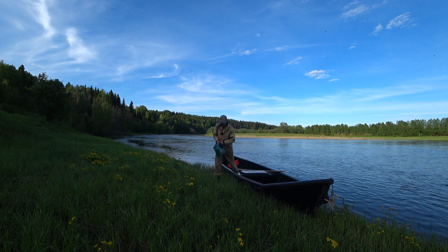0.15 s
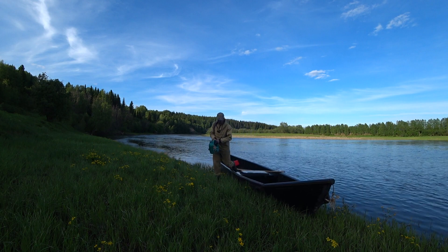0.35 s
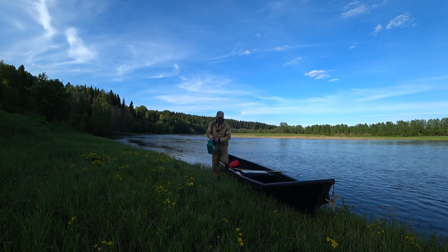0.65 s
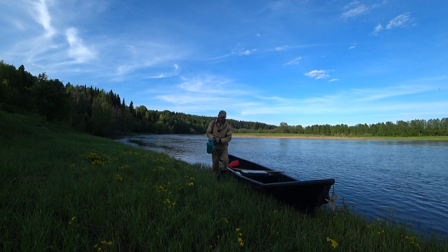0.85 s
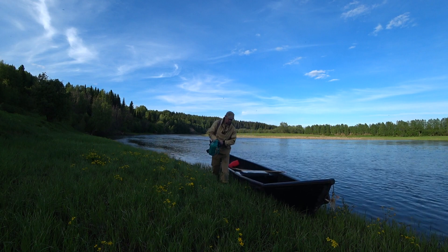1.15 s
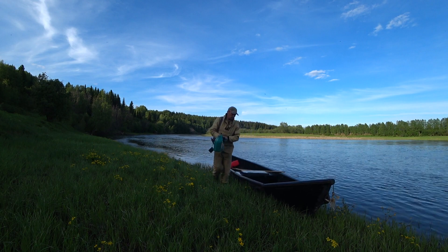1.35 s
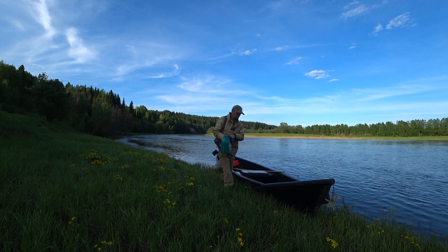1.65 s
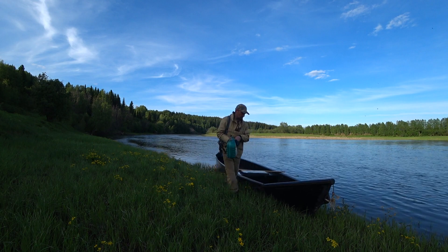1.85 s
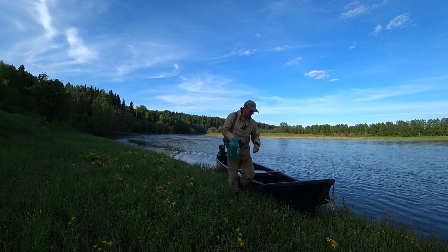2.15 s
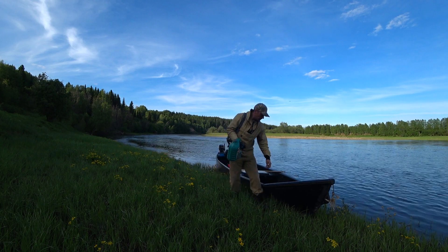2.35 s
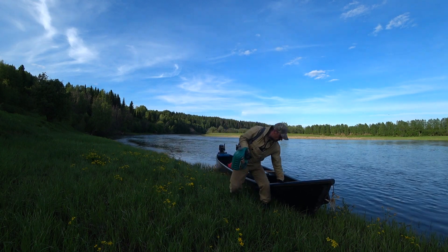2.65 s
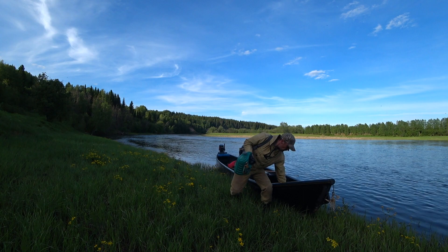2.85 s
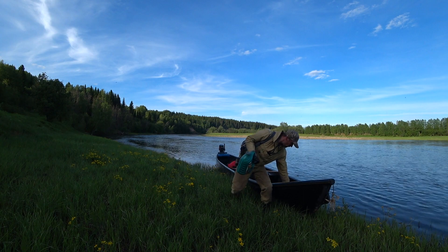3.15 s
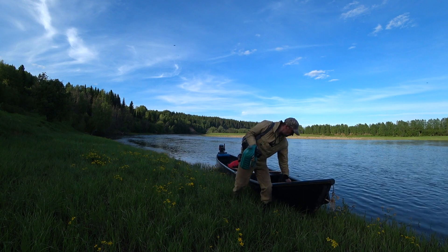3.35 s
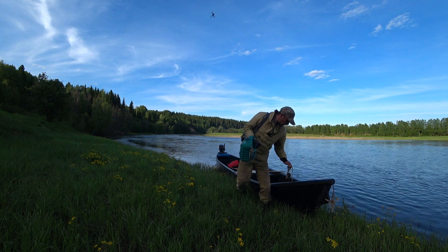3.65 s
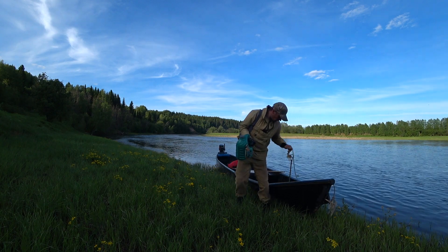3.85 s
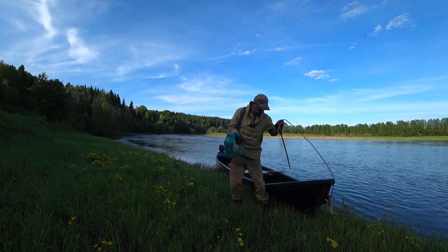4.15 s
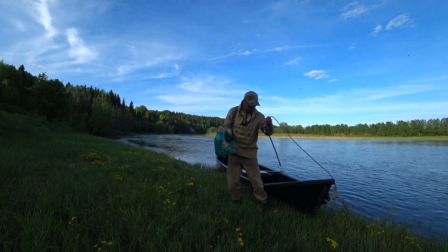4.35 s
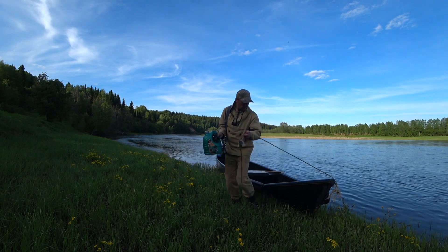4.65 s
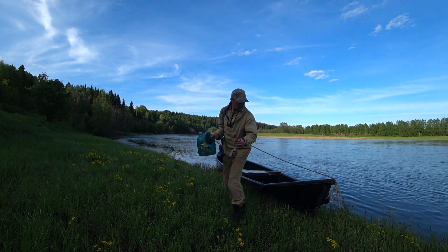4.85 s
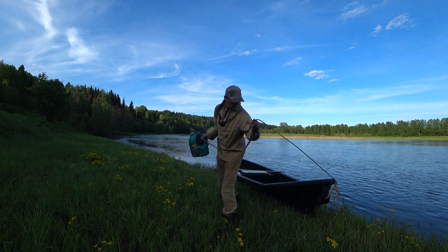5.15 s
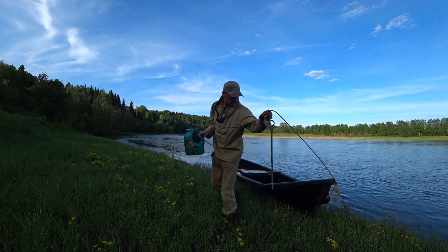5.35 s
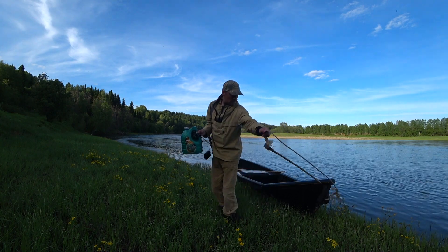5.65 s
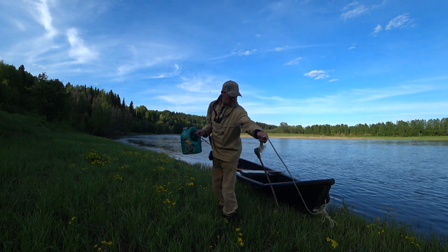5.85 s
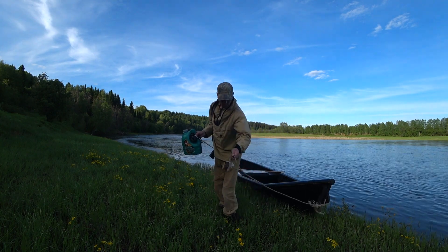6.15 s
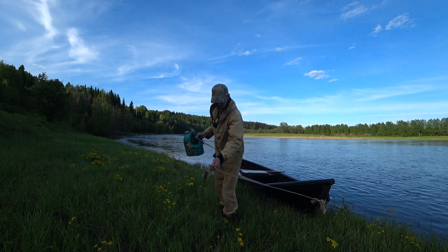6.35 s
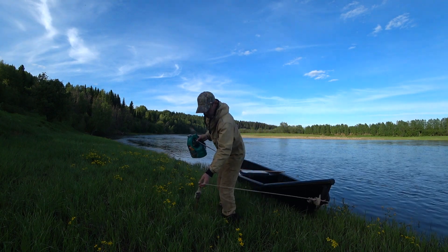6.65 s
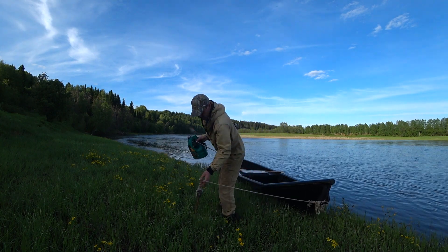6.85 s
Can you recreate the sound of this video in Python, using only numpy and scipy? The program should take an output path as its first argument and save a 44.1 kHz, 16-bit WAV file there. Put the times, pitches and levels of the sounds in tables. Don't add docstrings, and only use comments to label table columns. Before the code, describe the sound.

On a quiet grassy riverbank, a boot booms on a hollow plastic hull, then a plastic can bumps and trousers swish through snapping grass. Mid-way an anchor scrapes and knocks the bow in a quick cluster, ending in one loud clunk and a brief zip of rope. More rustling and hollow can bumps follow, then near quiet. A small camera hears it close, with faint water, birds and a grasshopper behind.

```python
import sys
import numpy as np
from scipy import signal
from scipy.fft import rfft, irfft, next_fast_len
from scipy.io import wavfile
from scipy.ndimage import uniform_filter1d, map_coordinates

SR = 44100
rng = np.random.default_rng(int(sys.argv[2]) if len(sys.argv) > 2 else 0)


def bounce(signal):
    frames = np.transpose(np.atleast_2d(signal))
    limited = np.clip(frames, -1, 1)
    pcm = np.round(limited * 32767).astype(np.int16)
    wavfile.write(sys.argv[1], SR, pcm)


def decibels_to_gain(level_db):
    exponent = np.asarray(level_db, float) / 20
    return 10 ** exponent


N = 308700

BANK_DB = -51
MIC_LOW_HZ, TOP_HZ = 57, 15830

# [f/Hz, correlation]
BANK_SPECTRUM = [(12, -34), (20, 3), (107, -9.5), (158, -10.5), (204, -13.5), (234, -11.5), (319, -8.5),
                 (446, -10), (780, -10.5), (849, -14), (1150, -9), (1910, -15), (16000, -34.5)]
BANK_ALIKE = [(60, 0.92), (180, 0.063), (550, -0.68), (1650, -0.66), (4970, -0.27), (15000, 0.0034)]
# [start t/s, end t/s, level/dB]
CHIRPS = [(0, .3, -70), (2.95, 3.17, -68), (3.48, 3.703, -65), (5.8, 6.02, -69), (6.3, 6.5, -69),
          (6.79, 7, -67)]
# [start t/s, end t/s, first f/Hz, last f/Hz, level/dB]
BIRDS = [
    (0, .13, 800, 790, -57.5),
    (.25, 0.29, 800, 800, -54),
    (0.302, .345, 890, 850, -55),
    (.015, .085, 5100, 4650, -69),
    (6.337, 6.458, 4250, 4200, -65),
    (6.34, 6.45, 5500, 5450, -70),
]
# [t/s, trouser rub level/dB, grass relative to rub/dB]
SWISH = [(0.0, -60.5, -6), (0.08, -61.5, -5), (0.64, -60, -7), (0.74, -49, -10), (0.8, -60, -8),
         (0.82, -56, -7), (0.94, -56, -6), (0.97, -48.5, -2), (1.07, -42, -5.5), (1.13, -44.5, -3),
         (1.15, -55.5, -5), (1.3, -48.5, -8.5), (1.32, -42.5, -10), (1.34, -50.5, 0), (1.36, -43, -7),
         (1.4, -44.5, -4), (1.71, -40.5, -1.5), (1.79, -48, -2.5), (1.87, -36.5, -7), (1.91, -46.5, -7.5),
         (2.01, -54, -1), (2.07, -45.5, -7), (2.11, -52, -3), (2.26, -47, -3), (2.3, -54.5, -7),
         (2.32, -45, -4.5), (2.42, -38.5, -3.5), (2.59, -41, -3.5), (2.63, -48, -5), (2.67, -49.5, -6),
         (2.75, -56, -7.5), (3.14, -65, -1), (3.16, -65, 0), (3.18, -46.5, -33), (3.27, -54, -10),
         (3.39, -48.5, -23), (3.41, -55, -12), (3.49, -46, -13), (3.53, -55.5, -3), (3.55, -53, -15),
         (3.57, -53, -5), (3.76, -51.5, -6.5), (3.88, -46.5, 1.5), (3.94, -39, -9), (3.96, -43, 2),
         (4.0, -36.5, -7), (4.03, -48.5, -6), (4.07, -50.5, -5.5), (4.42, -58.5, -3.5), (4.5, -51.5, -5.5),
         (4.68, -52.5, -4.5), (4.8, -41, -2.5), (5.01, -39.5, -3), (5.11, -41.5, -8), (5.17, -51, -7.5),
         (5.44, -55.5, -1.5), (5.56, -45, -1.5), (5.63, -39, -9.5), (5.65, -50.5, -10), (5.81, -65, -2),
         (6.24, -75, 2), (6.36, -58, -3.5), (6.69, -68, -4), (6.73, -49.5, -6), (6.82, -75, -3),
         (6.92, -69, -2), (6.94, -63, -11), (6.96, -70, 6), (7.0, -71, -3)]
# [t/s, feet level/dB, heavy cloth level/dB]
SHUFFLE = [(0.0, -57, -57), (0.56, -56.5, -52.5), (0.72, -53.5, -53.5), (0.86, -60, -57.5),
           (1.07, -52, -51.5), (1.46, -54, -58), (1.77, -53, -51.5), (2.18, -56.5, -56),
           (2.53, -54.5, -57.5), (2.67, -55.5, -56), (3.02, -60.5, -58), (3.2, -51.5, -46),
           (3.33, -45, -48), (3.43, -39.5, -44.5), (3.57, -38, -53), (3.68, -47.5, -54), (3.82, -60, -58),
           (4.11, -48.5, -49.5), (4.33, -54.5, -52), (4.56, -55.5, -54.5), (4.82, -55, -59),
           (4.95, -59, -52.5), (5.17, -50.5, -52), (5.89, -61.5, -56), (6.32, -64.5, -67), (7.0, -59, -63)]
# [f/Hz, density/dB]
CLOTH_SPECTRUM = [(1180, -10), (2000, -7.5), (2880, -5.5), (4850, 0.5), (5420, -1.5), (6720, -2.5),
                  (9500, -28), (12400, -6), (20900, -120)]
GRASS_SPECTRUM = [(4410, -37), (7500, -3.5), (12900, -10.5), (15200, -13.5), (16000, -32)]
FOLD_SPECTRUM = [(290, -37), (500, -5), (603, -6.5), (675, -1), (3000, -14), (3900, -14.5), (6600, -120)]
TREAD_SPECTRUM = [(29, -47), (50, -5.5), (178, -2), (241, -0.5), (575, -8), (900, -23.5), (1170, -46),
                  (1980, -120)]
# [t/s, peak level/dB, f/Hz, left over right/dB]
TICKS = [(0.0827, -43, 3090, 1.5), (0.2252, -37, 3950, 4), (0.382, -40, 3250, 1.0),
         (0.4938, -39, 3800, 1.5), (0.7068, -38, 6190, 1.5), (0.7257, -29.5, 4150, 7),
         (0.7664, -44.5, 3680, 1.5), (0.8164, -42, 6770, 5), (0.8259, -26.5, 3240, 2.5),
         (0.847, -31, 3600, 5), (0.9385, -38, 4880, 4), (0.9728, -37, 3660, 5), (1.044, -30, 6530, 3.0),
         (1.1996, -38, 4580, 8), (1.3154, -48, 3100, -5), (1.3154, -27, 5350, 3), (1.3244, -27, 5640, 4.0),
         (1.3528, -23, 5400, 3), (1.3652, -32, 6220, 2.5), (1.5648, -30, 6300, 4), (1.6646, -29, 4560, -2),
         (1.9492, -30, 4570, 2), (2.035, -40, 4880, 2.5), (2.071, -31.5, 6020, 3.0), (2.1655, -37, 4590, 0),
         (2.2353, -32, 5030, 2.5), (2.3116, -37, 7010, 5), (2.3286, -34.5, 5480, -6),
         (2.9394, -41, 4070, 2.0), (4.1594, -35, 4390, 5), (4.2547, -32, 4160, 1.5),
         (4.2762, -23.5, 4030, 3), (4.3569, -26.5, 2700, 1.5), (4.4094, -50, 4080, -2),
         (4.7182, -35, 5100, 1), (5.2245, -34, 5710, 3), (5.7713, -42, 6590, 1.0), (5.9327, -40, 4500, 2.0),
         (6.1095, -58, 4090, -2), (6.347, -46, 4240, 2.5), (6.9405, -38.5, 6450, 2.5)]
# [f/Hz, level/dB, t60/s]
CAN_MODES = [(161.5, -7.5, 0.22), (186.4, -0.5, 0.12), (316, -14, 0.11), (425, -4.5, 0.035),
             (595, -5, 0.068), (833, -7.5, 0.08), (1113, -14, 0.06), (1380, -13, 0.12), (2340, -3, .02)]
STERN_MODES = [(69.5, -6, 0.24), (96, -6.5, 0.65), (116, -7.5, 0.51), (144.5, 0, 0.42), (164.5, -8, 0.23),
               (200, -4, 0.29), (245, -13, 0.17), (327, -17, 0.22), (400, -22, 0.17), (565, -29, .08),
               (850, -34, .1)]
DECK_MODES = [(98.3, -15.5, 0.58), (138, -13, 0.19), (218, -4, 0.26), (269, 0, .2), (302, 0.5, 0.22),
              (385, -4.5, 0.14), (584, -7.5, 0.24), (700, -4, 0.098), (770, -5, 0.088), (1110, -7.5, 0.12),
              (1670, -7, 0.074), (1930, -10.5, 0.076), (2510, -8.5, 0.043), (2770, -34, 0.028),
              (3600, -17, 0.058), (4550, -16, 0.044)]
RIB_MODES = [(138.2, -12.5, 0.57), (210, -3, 0.22), (300, 0, .1), (371.7, -3.5, .2), (478, -7.5, 0.085),
             (604, 1, 0.14), (700, -9, 0.14), (872, -5.5, 0.075), (1160, -12, .06), (1294, -1.5, 0.039),
             (1500, -24, .05), (1880, -8.5, 0.035), (2460, -26, 0.039), (2920, -31, 0.021)]
RAIL_MODES = [(96.8, -7.5, 0.42), (122.6, -8.5, 0.34), (200, -13.5, .35), (274.6, -1.5, 0.21),
              (311, -2, 0.15), (390, -6, 0.23), (522, -11, 0.15), (599, 0, 0.092), (668, 0, 0.037),
              (710, -2, 0.1), (1044, -5.5, 0.057), (1142, -2, 0.062), (1300, -25, 0.061),
              (1760, -7.5, 0.056), (2000, -32, .03), (2570, -8, 0.036), (2700, -34, 0.026),
              (3350, -9, 0.021), (4600, -32, .015)]
FLUKE_MODES = [(332, -4, .08), (900, -10, .05), (1230, 2, 0.062), (1390, -1, 0.05), (1650, -4, 0.037)]
# [t/s, level/dB, hardness f/Hz, contact length/s, ring share of t60/1]
BUMP_BLOWS = [(.262, -39, 300, 0.013, 1.2), (1.239, -27, 5050, 0.0051, 0.58), (1.245, -26, 400, .002, 1),
              (1.397, -35, 3530, .003, 0.68), (1.403, -44, 300, 0.0017, 2.5), (1.5, -46, 400, 0.011, 1.6),
              (1.59, -43.5, 400, .01, 1.3), (1.72, -41.5, 800, 0.011, 1), (1.855, -39, 1500, 0.013, 0.59),
              (2.06, -49, 600, 0.022, 1.3), (5.09, -40, 600, .01, 0.63), (5.238, -28.5, 2000, 0.0054, 0.55),
              (5.247, -24.5, 1500, 0.0046, 0.4), (5.262, -32.5, 1180, .003, 1),
              (5.61, -41.5, 1500, 0.03, 0.43)]
BOOT_BLOWS = [(.568, -21.5, 1500, 0.0027, 1), (.588, -24.5, 300, 0.0024, 0.72),
              (.625, -22.5, 300, 0.0058, 0.88), (.69, -31.5, 300, .005, 0.57),
              (.73, -40, 300, 0.0046, 0.38), (.762, -38, 300, 0.004, 0.47), (.855, -48, 300, .005, 0.75),
              (1.095, -39, 500, 0.024, 0.38), (1.115, -45, 400, .01, 0.46), (3.66, -36, 200, 0.0092, 0.79),
              (4.595, -42, 800, 0.013, .5)]
LIFT_BLOWS = [
    (3.157, -37.5, 5000, 0.013, 0.81),
    (3.178, -20.5, 5600, 0.011, 1),
    (3.204, -23.5, 4800, 0.0061, 0.63),
    (3.22, -20.5, 800, 0.0046, .8),
    (3.248, -31, 2000, 0.0065, 0.76),
    (3.388, -31.5, 2950, 0.0069, 0.83),
    (3.41, -34, 1230, 0.0088, 0.89),
    (3.432, -38, 4000, .01, 0.51),
    (3.488, -39, 1500, .01, 0.74),
]
KNOCK_BLOWS = [
    (3.543, -19, 4700, 0.0024, 1),
    (3.557, -24.5, 1500, 0.0035, 0.87),
    (3.575, -19.5, 900, .002, 0.36),
    (3.61, -34, 700, .004, 0.88),
    (4.29, -45.5, 1500, .015, 0.87),
    (4.335, -47, 500, .005, .8),
]
CLUNK_BLOWS = [
    (3.928, -11.5, 6000, 0.0052, 0.98),
    (3.975, -28.5, 800, .003, 0.51),
]
TOCK_BLOWS = [
    (3.625, -33, 4000, 0.0035, 0.74),
    (3.637, -42, 3000, .003, 0.85),
    (4.407, -56, 1500, .002, .6),
]
# [t/s, level/dB]
DRAG = [
    (3.1, -58),
    (3.186, -54),
    (3.342, -44),
    (3.452, -33),
    (3.56, -46),
]
# [f/Hz, t60/s]
SHORE_DECAY = [(150, 0.1), (1000, 0.25), (6000, 0.13)]
# [t/s, f/Hz, level/dB]
ROPE = [
    (4.04, 2800, -64),
    (4.08, 2850, -48),
    (4.12, 3250, -50),
    (4.16, 3330, -54),
    (4.22, 3480, -59),
    (4.25, 3480, -75),
]


def unit(x):
    return x / np.sqrt(np.mean(x ** 2) + 1e-20)


def along(points, hz):
    f, v = np.transpose(points)
    return np.interp(np.log(hz + 1), np.log(f + 1), v)


def curves(rows):
    s, *cols = np.transpose(rows)
    return [np.interp(np.arange(N) / SR, s, c) for c in cols]


def wobble(rate_hz):
    knots = rng.standard_normal(int(N * rate_hz / SR) + 4)
    return map_coordinates(knots, [np.arange(N) * rate_hz / SR])


def filtered(x, response):
    m = next_fast_len(N + 8192)
    return irfft(rfft(x, m) * response(np.fft.rfftfreq(m, 1 / SR)), m)[..., :N]


def panned(x, pan_db):
    return x * decibels_to_gain([[pan_db / 2], [-pan_db / 2]])


def rush(spectrum, alike, patchy_db, grit_db):
    raw = rng.standard_normal((2, N)) * decibels_to_gain(grit_db * wobble(700))
    z = signal.stft(raw, nperseg=256)[2]
    field = rng.standard_normal(z.shape[1:])
    field = uniform_filter1d(uniform_filter1d(field, size=6, axis=0), size=8, axis=1)
    pair = signal.istft(z * decibels_to_gain(patchy_db * unit(field)), nperseg=256)[1][:, :N]

    def response(hz):
        turn = np.arccos(np.clip(along(alike, hz), -1, 1)) / 2
        return decibels_to_gain(along(spectrum, hz)) * [np.cos(turn), np.sin(turn)]

    mid, side = filtered(pair, response)
    return unit(np.array([mid + side, mid - side]))


def bank():
    level_db = BANK_DB + 0.5 + 0.6 * wobble(3.21)
    return decibels_to_gain(level_db) * rush(BANK_SPECTRUM, BANK_ALIKE, patchy_db=1.2, grit_db=0.4)


def grasshopper():
    t = np.arange(N) / SR
    gate = np.zeros(N)
    for start_s, end_s, db in CHIRPS:
        gate += decibels_to_gain(db) * np.clip(np.minimum(t - start_s, end_s - t) / 0.04, 0, 1)
    body = [(2700, -40), (3200, -6), (3700, -9), (4300, -40)]
    wing = [(9200, -40), (9900, -3), (10300, 0), (10900, -6), (11600, -40)]
    return gate * rush(body + wing, [(9000, 0.4)], patchy_db=1.4, grit_db=2.4)


def birds():
    t, out = np.arange(N) / SR, np.zeros(N)
    for start_s, end_s, first_hz, last_hz, db in BIRDS:
        hz = np.interp(t, [start_s, end_s], [first_hz, last_hz]) * (1 + 0.01 * wobble(60))
        gate = np.clip(np.minimum(t - start_s + 0.005, end_s - t) / 0.012, 0, 1)
        out += decibels_to_gain(db + 2.3 * wobble(50)) * gate * np.sin(2 * np.pi * np.cumsum(hz) / SR)
    return out


def legs():
    rub_db, grass_db = curves(SWISH)
    rub_now_db = rub_db + 0.96 * wobble(30)
    cloth = rush(CLOTH_SPECTRUM, [(4000, 1.0)], patchy_db=1.5, grit_db=1.0)
    grass = rush(GRASS_SPECTRUM, [(9000, 0.98), (15000, 0.91)], patchy_db=2.3, grit_db=1.5)
    return panned(decibels_to_gain(rub_now_db) * cloth + decibels_to_gain(rub_now_db + grass_db) * grass, 3.7)


def jacket():
    rub_db, _ = curves(SWISH)
    _, fold_db = curves(SHUFFLE)
    level_db = fold_db - 1.0 + 0.31 * (rub_db + 53) + 1.33 * wobble(25)
    fold = rush(FOLD_SPECTRUM, [(600, 0.1), (2500, 1.0)], patchy_db=4.5, grit_db=2.0)
    return panned(decibels_to_gain(level_db) * fold, 0.3)


def feet():
    tread_db, _ = curves(SHUFFLE)
    level_db = tread_db - 1.5 + 2.2 * wobble(14)
    tread = rush(TREAD_SPECTRUM, [(60, 1.0), (600, 0.69)], patchy_db=1.5, grit_db=1.2)
    return panned(decibels_to_gain(level_db) * tread, -0.7)


def ticks():
    out, t = np.zeros((2, N + SR)), np.arange(500) / SR
    for s, db, hz, pan_db in TICKS:
        wide = signal.butter(3, [hz / 3.6, min(hz * 1.8, 12000)], "bandpass", fs=SR)
        click = signal.lfilter(*wide, rng.standard_normal(len(t)) * decibels_to_gain(-60 * t / 0.0075))
        stalk = np.sin(2 * np.pi * hz * t) * decibels_to_gain(-60 * t / 0.0073)
        snap = 0.87 * stalk + 1.01 * click
        out[:, round(s * SR):][:, :len(t)] += panned(decibels_to_gain(db - 1.5) * snap, pan_db)
    return out[:, :N]


def ring(modes, hard_hz, share):
    t = np.arange(SR * 3 // 4) / SR
    hz, db, t60 = np.transpose(modes)[..., None]
    soft = 1 / (1 + (hz / hard_hz) ** 2)
    swell = 1 - np.exp(-t * hz / 0.36)
    twin = np.sin(2 * np.pi * hz * t) + 0.38 * np.sin(2 * np.pi * 1.07 * hz * t)
    sides = (-1) ** np.arange(len(modes))[:, None]
    decay = decibels_to_gain(db - 60 * t / (t60 * share))
    return np.sum(sides * decay * soft * swell * twin, axis=0)


def lowpassed(x, edge_hz):
    return signal.sosfilt(signal.butter(4, edge_hz, fs=SR, output="sos"), x)


def struck(blows, modes):
    out, t = np.zeros(N + SR), np.arange(SR // 20) / SR
    for s, db, hard_hz, length_s, share in blows:
        chatter, hiss = rng.standard_normal((2, len(t)))
        contact = 0.041 * chatter * np.exp(-t / length_s)
        contact[0] = 1
        sound = signal.fftconvolve(contact, ring(modes, hard_hz, share))
        sharp = lowpassed(hiss, 0.9 * hard_hz) * decibels_to_gain(-60 * t / 0.025)
        dull = lowpassed(hiss, 0.35 * hard_hz) * decibels_to_gain(-60 * t / 0.066)
        sound[:len(t)] += 0.92 * sharp + 1.2 * dull
        out[round(s * SR):][:len(sound)] += decibels_to_gain(db) * sound
    return out[:N]


def can():
    return panned(struck(BUMP_BLOWS, CAN_MODES), -0.36)


def boot():
    return panned(struck(BOOT_BLOWS, STERN_MODES), -1.4)


def anchor():
    drag_db, = curves([(0, -120), (3.09, -120)] + list(DRAG) + [(3.6, -120)])
    rough = rng.standard_normal(N) * decibels_to_gain(9.7 * wobble(60))
    scrape = signal.fftconvolve(rough, ring(DECK_MODES, hard_hz=2500, share=0.4))[:N]
    bow = struck(LIFT_BLOWS, DECK_MODES) + struck(KNOCK_BLOWS, RIB_MODES)
    bow += struck(CLUNK_BLOWS, RAIL_MODES) + struck(TOCK_BLOWS, FLUKE_MODES)
    bow += decibels_to_gain(drag_db - 3.0) * unit(scrape)
    return panned(bow, -2.0)


def shore(x):
    hz, t, z = signal.stft(rng.standard_normal((2, SR // 3)), SR, nperseg=256)
    decay = decibels_to_gain(-60 * t / along(SHORE_DECAY, hz)[:, None])
    tail = signal.istft(z * decay, SR, nperseg=256)[1]
    late = np.pad(x, (300, 0))[None]
    return signal.fftconvolve(late, tail / np.linalg.norm(tail[0]), axes=1)[:, :N]


def rope():
    hz, db = curves(ROPE)
    turn = 2 * np.pi * np.cumsum(hz * (1 + 0.029 * wobble(200))) / SR
    level = decibels_to_gain(db + 2.7 * wobble(90)) * (db > -74)
    return level * (np.sin(turn) + 0.62 * np.sin(0.55 * turn))


def scene():
    knocks = ticks() + can() + boot() + anchor()
    echo = decibels_to_gain(-21) * shore(knocks.mean(axis=0))
    walker = legs() + jacket() + feet()
    return bank() + grasshopper() + birds() + walker + knocks + echo + rope()


def band_limit(x):
    return signal.sosfilt(signal.butter(12, 16420, fs=SR, output="sos"), x)


def record(dry):
    heard = signal.lfilter(*signal.butter(1, MIC_LOW_HZ, "highpass", fs=SR), dry)
    mix = filtered(heard, lambda hz: hz < TOP_HZ)
    return band_limit(mix)


dry = scene()
out = record(dry)
bounce(out)
```